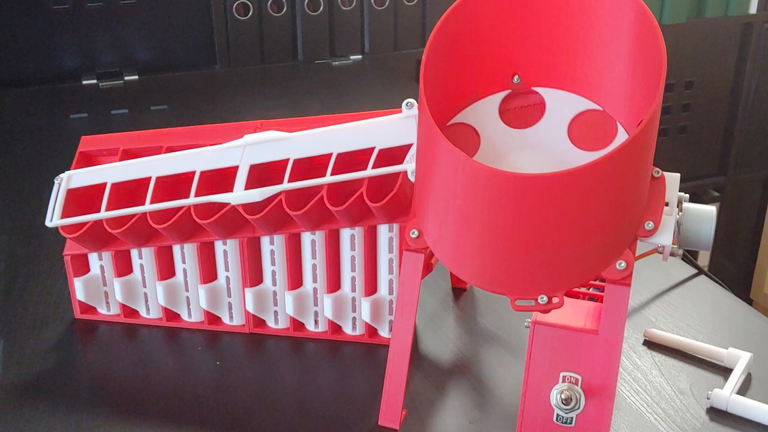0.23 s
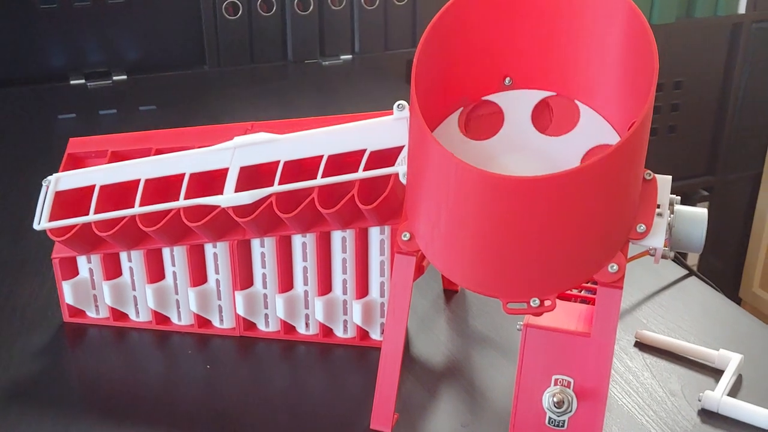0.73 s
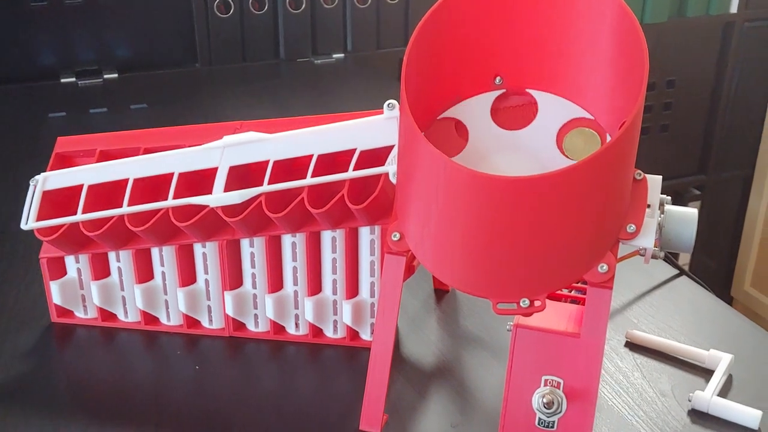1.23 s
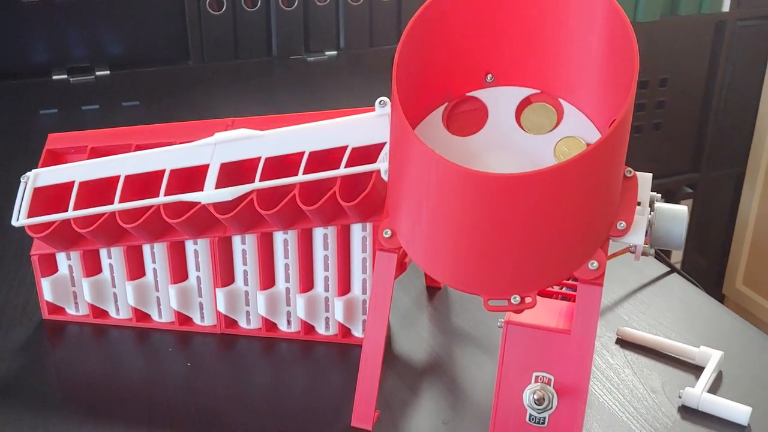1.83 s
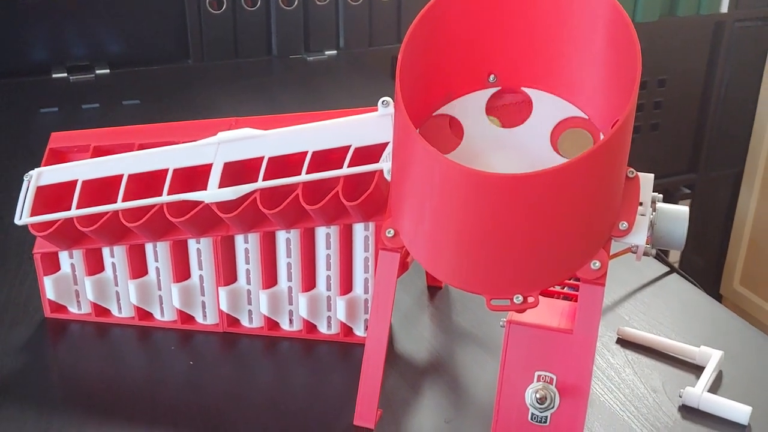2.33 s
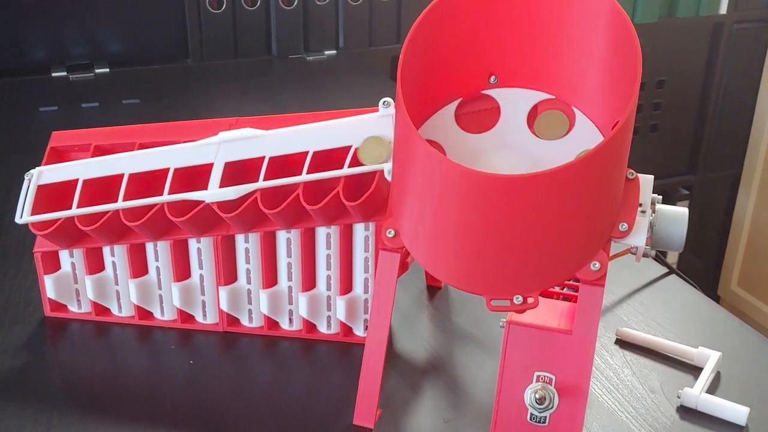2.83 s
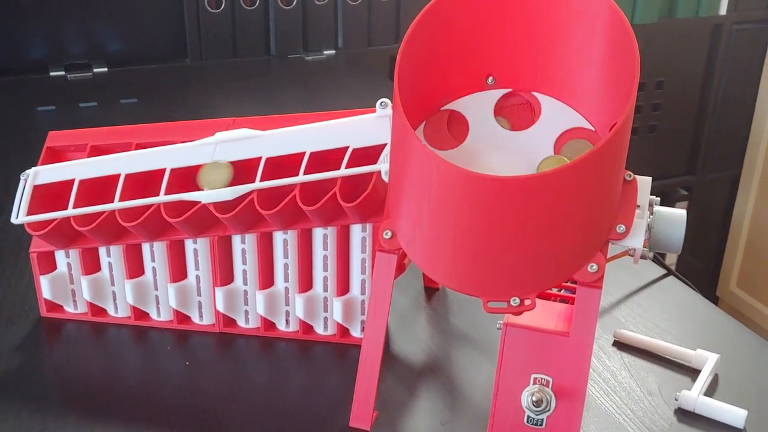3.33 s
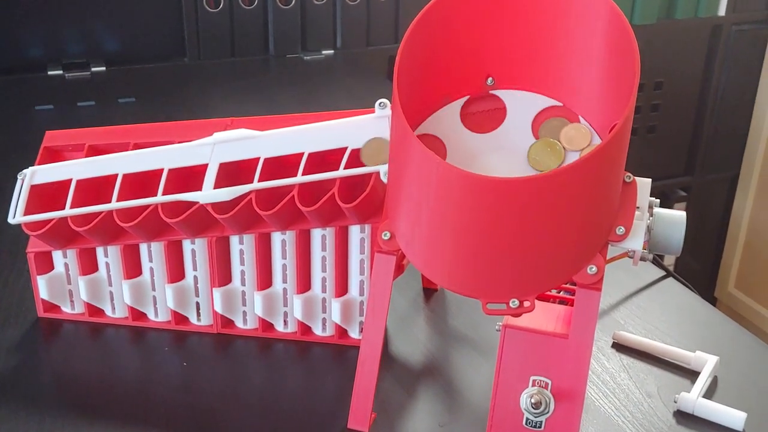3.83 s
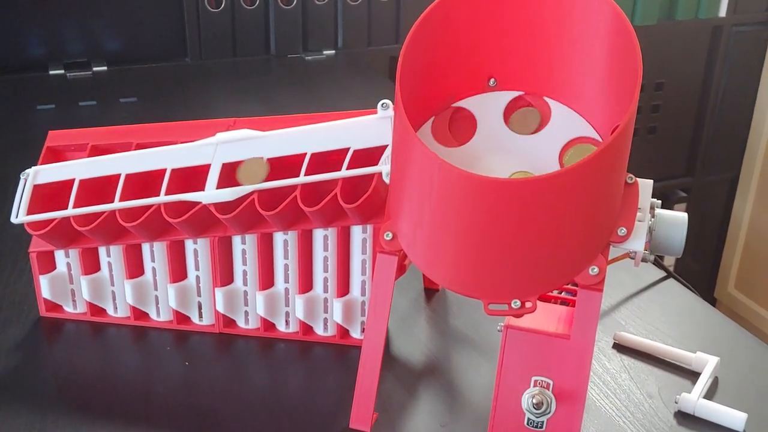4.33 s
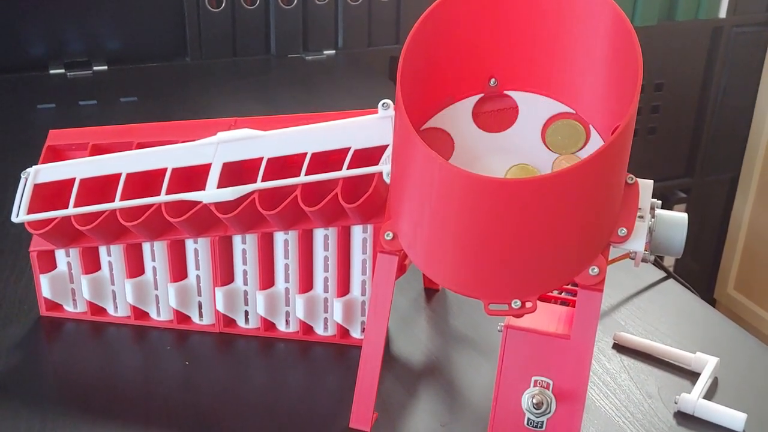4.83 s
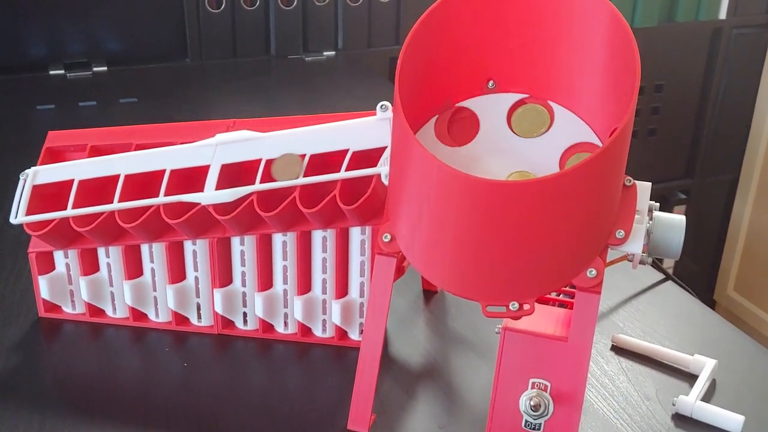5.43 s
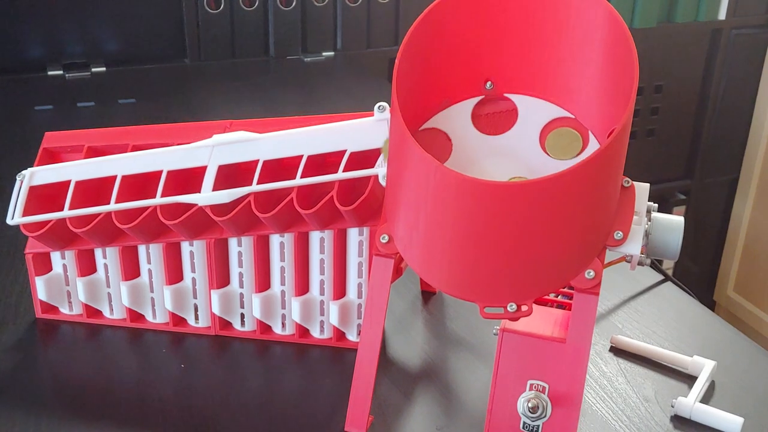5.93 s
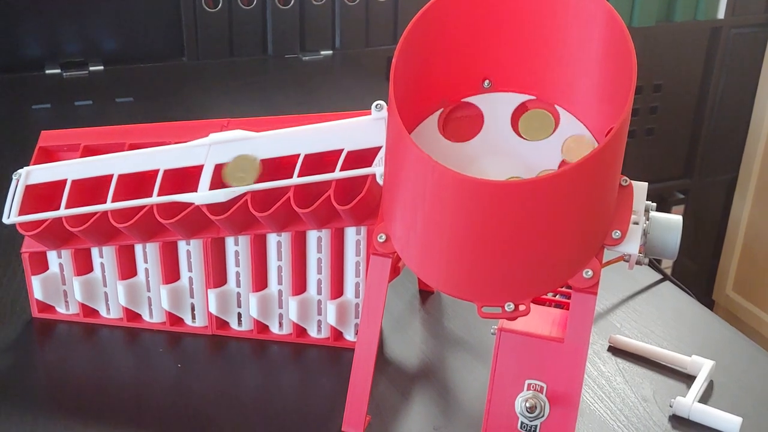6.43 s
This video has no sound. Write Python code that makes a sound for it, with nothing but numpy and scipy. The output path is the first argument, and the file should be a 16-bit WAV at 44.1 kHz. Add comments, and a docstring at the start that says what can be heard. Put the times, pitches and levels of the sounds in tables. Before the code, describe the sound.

A faint geared motor runs throughout, a low hum with a soft whine near 500 hertz and a rough whirr. In the first 1.5 seconds coins knock and scrape sparsely against a hollow plastic hopper, with a cluster near 0.2 to 0.7 and sharper knocks around 1.5. After a short lull, a dense dry clatter builds from 2.1 to 2.8. A coin then rolls down a ribbed plastic ramp, and a strong knock comes at 3.35. From 3.6 to 3.9 coins drop with hollow tube knocks, clinks and bright cracks. More rolling follows, with drops around 4.4 to 4.6 and a hard crack at 4.75 that rings briefly. Shuffling swells near 5.3; pocket snaps at 5.75 lead to the loudest landing at 5.87, with a thin high ring and slight thump. Another coin rolls to the end at 6.7 among light ticks. Close stereo pickup, small room.

```python
"""Coins scrape, tumble and knock in the plastic hopper of a motor-driven sorter, roll down its ramp and drop.
Noise bursts through the plastic's resonances make the scrapes and knocks; decaying sines make the clinks,
pocket snaps, tube knocks and free rings. Landing coins crack as coloured noise over a low table thump.
Underneath, a geared motor hums, whines and whirrs; decaying noise tails answer as a small room, in stereo."""
import sys
import numpy as np
from scipy import signal
from scipy.fft import rfft, irfft, next_fast_len
from scipy.io import wavfile
from scipy.ndimage import uniform_filter1d, map_coordinates

SR = 44100
rng = np.random.default_rng(int(sys.argv[2]) if len(sys.argv) > 2 else 0)


def wav_record(signal):
    """Record a signal, one row per channel, as 16-bit PCM in the file named by sys.argv[1]."""
    frames = np.transpose(np.atleast_2d(signal))
    bounded = np.clip(frames, -1, 1)
    # unit amplitude maps onto the largest positive 16-bit level
    quanta = np.round(bounded * 32767).astype(np.int16)
    wavfile.write(sys.argv[1], SR, quanta)


N = 294588

# a coin's edge knocks on the wall: (time [s], level [dB], edge tick against wall clack [dB])
EDGE_KNOCKS = [(0.1534, -18, -6.5), (0.156, -13, -5.5), (0.1675, -28, -6), (0.223, -18.5, -6),
               (0.2338, -23.5, -11), (.2655, -27.5, -2), (0.2871, -14.5, -4), (.294, -22.5, 1.5),
               (0.3585, -29, 1), (.376, -28, 0), (0.4215, -22.5, 3), (.464, -30, -4), (.515, -38, -9),
               (.549, -24.5, 0.5), (.613, -18, -1), (0.6251, -18, -21), (0.637, -21.5, -3.5),
               (.697, -23.5, -1), (.714, -23, -1.5), (0.873, -34.5, 0.5), (0.936, -30, -0.5),
               (1.0249, -28, -5.5), (1.0688, -36, -4), (1.086, -41, 6), (1.108, -32.5, 7.5),
               (1.1268, -29, 0), (1.1343, -17.5, -8), (1.1503, -31, 3), (1.2027, -28.5, 1),
               (1.2565, -22.5, -5.5), (1.328, -42, 3.5), (1.4193, -32, -5), (1.4537, -18.5, -8),
               (1.4975, -14, -7.5), (1.505, -20, -6.5), (2.011, -36, -7), (2.052, -28, -11),
               (2.078, -26, -1.5), (2.106, -34, -3), (2.127, -32.5, 1), (2.1593, -16.5, -9),
               (2.196, -19.5, -9), (2.2235, -18.5, -1), (2.2405, -16, -18), (2.252, -29, -16),
               (2.279, -15.5, -14), (2.3037, -18.5, -22), (2.3235, -20, -14), (2.3345, -19, -15),
               (2.359, -17.5, -17), (2.388, -17.5, -18), (2.418, -22, -28), (2.441, -23, -25),
               (2.468, -19.5, -31), (2.5503, -18, -22), (2.563, -21.5, -17), (2.592, -24, -16),
               (2.609, -15, -5.5), (2.618, -18.5, -8), (2.638, -17.5, -8.5), (2.7585, -20.5, -14),
               (2.7785, -13.5, -3), (2.7818, -15, -6.5), (2.9995, -26.5, -4), (3.2565, -21, -9.5),
               (3.286, -27, -2), (3.315, -25, -6), (3.3455, -10, -9), (3.401, -17, -10), (3.5692, -13, -23),
               (3.6387, -16.5, 0), (3.9856, -30.5, 9.5), (4.037, -27.5, -10), (4.0496, -20.5, -1.5),
               (4.2191, -23, -4), (4.3667, -23.5, -10), (4.376, -24, 6), (4.4905, -22.5, 0.5),
               (4.537, -19.5, -13), (4.5714, -21, -5), (4.5833, -25, -1), (4.673, -22.5, -5),
               (4.822, -30, 4), (4.831, -32, 6), (4.893, -30, 5.5), (4.9306, -31, 5.5), (5.177, -26, -7),
               (5.2105, -14.5, -3.5), (5.238, -27, 2), (5.343, -22, -19), (5.364, -27, -12),
               (5.56, -27, -12), (5.601, -17, -9.5), (5.647, -28, -6), (5.665, -15.5, -10),
               (5.7025, -26, -6), (5.7528, -23, 3), (5.783, -37, 5), (5.7931, -19.5, 0), (5.937, -36.5, 15),
               (5.964, -40, 18), (6.0416, -22.5, 0), (6.174, -39, -2), (6.292, -33, -4),
               (6.338, -25.5, -14), (6.47, -26.5, -2), (6.566, -29.5, -4), (6.598, -24.5, -10),
               (6.625, -24, -6)]


def amp(db):
    """Decibels to gain."""
    return 10 ** (np.asarray(db) / 20)


def unit(x):
    """x at rms 1."""
    return x / np.sqrt(np.mean(x ** 2) + 1e-20)


def along(points, hz):
    """Values of (frequency [Hz], value) points, read on a log frequency axis."""
    f, v = np.transpose(points)
    return np.interp(np.log(hz + 1), np.log(f + 1), v)


def bumps(modes, hz):
    """Gain in dB of a set of resonances."""
    return sum(db / (1 + (2 * (hz - centre) / width) ** 2) for centre, width, db in modes)


def wobble(rate):
    """A smooth random curve with rate knots a second."""
    knots = rng.standard_normal(int(N * rate / SR) + 4)
    return map_coordinates(knots, [np.arange(N) * rate / SR])


def response(gain_db, size=8192):
    """The causal, minimum-phase impulse response that has the gain gain_db(Hz)."""
    gain = amp(gain_db(np.fft.rfftfreq(size, 1 / SR)))
    cepstrum = irfft(np.log(gain + 1e-6))
    # folding the cepstrum forward in time makes the response causal
    cepstrum[1:size // 2] *= 2
    cepstrum[size // 2 + 1:] = 0
    return irfft(np.exp(rfft(cepstrum)))[:size // 2]


def through(x, impulse):
    """Channels x convolved with an impulse response."""
    return signal.oaconvolve(x, np.atleast_2d(impulse), axes=1)[:, :N]


def add(track, s, sound):
    """Mix a sound into the track at time s."""
    part = track[:, max(round(s * SR), 0):][:, :sound.shape[-1]]
    part += sound[..., :part.shape[1]]


def plastic(lo_hz, hi_hz):
    """The sorter's ring within one register: contact colour and body resonances, at energy 1."""
    # resonances of hopper and ramp: (frequency [Hz], width [Hz], level [dB])
    body_modes = [(154, 44, 16), (302, 59, 6.5), (461, 24, 4), (546, 15, -8), (631, 24, 7), (794, 65, 1.5),
                  (951, 49, 5), (1193, 27, 1.5), (1363, 56, -9), (1680, 18, -8.5), (1670, 19, 1),
                  (1810, 11, 4), (2353, 24, 5.5), (2782, 120, 3.5), (3570, 170, 2)]
    # colour of a coin's contact with the plastic: (frequency [Hz], level [dB])
    contact_colour = [(30, -38), (110, -37), (200, -18.5), (350, -15), (700, -5), (1100, -1), (2000, 3.5),
                      (3000, -5), (5000, -8.5), (7200, -8.5), (8400, -35.5), (11000, -34.5), (12800, -37),
                      (15500, -33.5)]

    def gain_db(hz):
        low_skirt = 1 + (lo_hz / (hz + 1)) ** 6
        high_skirt = 1 + (hz / hi_hz) ** 6
        return along(contact_colour, hz) + bumps(body_modes, hz) - 10 * np.log10(low_skirt * high_skirt)

    ring = response(gain_db)
    return ring / np.linalg.norm(ring)


def jostle(rate=200, scatter_db=1.5, contact_s=0.006, clatter_db=-1.0, scrape_db=-2.5, glint_db=-16.5,
           hardness=0.41):
    """Jostled coins: many small contacts over a sliding rub excite the plastic, register by register."""
    # the turning disc drags its coins along the hopper floor: (time [s], level [dB])
    drag_curve = [(0, -37), (.1, -50), (.18, -43), (1.6, -39.5), (1.85, -42), (2.3, -34.5), (6.68, -37)]
    # a rolling rim on the ribbed ramp: (frequency [Hz], level [dB])
    rim_colour = [(400, -36), (900, 13), (1500, 1), (2000, -10), (2380, 22), (2600, -22), (4000, -40)]
    smooth_scrape_db = -8.5  # edge scrape of dragged or rolling coins against their clatter
    ramp_db, rim_db = -7.5, -2  # ramp rumble and rim against the clatter of a rolling coin
    rub = 0.09  # steady sliding power under the contacts

    shoved, scraped = shoving()
    rolled = rolling()
    dragged = amp(np.interp(np.arange(N) / SR, *np.transpose(drag_curve))) ** 2
    smooth = rolled + dragged
    clatter = 10 * np.log10(shoved + smooth)
    scrape = 10 * np.log10(scraped + smooth * amp(smooth_scrape_db) ** 2)

    strength = amp(scatter_db * np.clip(rng.standard_normal(N), -2, 2)) ** 2
    touches = (rng.random(N) < rate / SR) * strength
    power = signal.lfilter([1], [1, -np.exp(-1 / (contact_s * SR))], touches)
    power /= np.abs(uniform_filter1d(power, SR // 14)) + 1e-9  # level out the local density

    def force():
        return np.sqrt(power + rub) * rng.standard_normal((2, N))

    body = amp(clatter + clatter_db) * through(force(), plastic(45, 3100))
    ramp = amp(ramp_db) * np.sqrt(rolled) * through(force(), plastic(280, 510))
    rim_noise = unit(through(force(), response(lambda hz: along(rim_colour, hz))))
    rim = amp(rim_db) * np.sqrt(rolled) * rim_noise
    edges = amp(scrape + scrape_db) * through(force(), plastic(2370, 10700))
    # harder contacts are shorter, so the top octave grows faster than the rest
    glint_level = scrape + glint_db + hardness * (scrape - scrape.max())
    glint = amp(glint_level) * through(force(), plastic(14000, 24000))
    return body + ramp + rim + edges + glint + grinding(clatter, scrape) + ticks(clatter, scrape)


def shoving():
    """Power of clatter and edge scrape as the disc shoves the heap, which swells and settles."""
    # (time of the height [s], length [s], level [dB], edge scrape against clatter [dB])
    shove_list = [(0.326, 0.16, -29, -0.5), (0.446, 0.26, -35, -8), (0.638, 0.18, -26.5, -2.5),
                  (1.052, 0.027, -30, -0.5), (1.16, 0.34, -32, -5), (1.272, 0.051, -36, -2),
                  (1.52, 0.11, -31, -4), (1.665, 0.058, -27, -3.5), (2.077, 0.13, -30, -6.5),
                  (2.268, 0.14, -18, -2), (2.588, 0.83, -27, -28), (2.762, 0.073, -27.5, 1.5),
                  (3.296, 0.15, -30, -1.5), (3.394, 0.071, -22, -1), (3.483, 0.19, -22, -10),
                  (3.699, 0.12, -22, -3), (3.708, 0.018, -16, -10), (4.047, 0.43, -38.5, 2),
                  (4.24, 0.14, -40, 7), (4.376, 0.16, -28, 1.5), (4.562, 0.21, -30, -5),
                  (4.804, 0.29, -30.5, -8), (5.276, 0.2, -20.5, -3.5), (5.419, 0.054, -28, 3.5),
                  (5.57, 0.13, -36, 6.5), (5.705, 0.2, -20.5, -14.5), (5.88, 0.21, -29.5, -4),
                  (6.638, 0.092, -28, -3)]
    fall_db, point = 18, 1.365  # drop one length before the height; shape (1 pointed, 2 round)
    settle_ratio = 0.95  # settling time over swelling time
    t, clatter, scrape = np.arange(N) / SR, np.zeros(N), np.zeros(N)
    for s, length, db, edge_db in shove_list:
        away = np.maximum(s - t, (t - s) / settle_ratio) / length
        power = amp(db - fall_db * np.minimum(away, 10) ** point) ** 2
        clatter += power
        scrape += power * amp(edge_db) ** 2
    return clatter, scrape


def rolling():
    """Power of the coins rolling down the ramp, each louder as it gains speed."""
    # (start [s], length [s], level at the start [dB])
    roll_list = [(2.8, 0.52, -37.5), (3.912, 0.23, -38.5), (5.103, 0.56, -42), (6.018, 0.8, -37)]
    growth_db_per_s = 6
    edge_s = 0.38  # fade-in ahead of the start and fade-out after the end
    t, power = np.arange(N) / SR, np.zeros(N)
    for s, length, db in roll_list:
        on_ramp = np.clip(np.minimum(t - s, s + length - t) / edge_s + 1, 0, 1)
        gain = amp(db + growth_db_per_s * np.clip(t - s, 0, length))
        power += (on_ramp * gain) ** 2
    return power


def grinding(clatter, scrape, count=1100, grain_db=0.0, crisp_db=1.5, crisp_t60=0.0013):
    """Coins catch and slip on ribbed plastic: each slip is a dry grain of its own pitch with a crisp edge."""
    low_hz, high_hz = 1000, 2500
    grain_t60, range_db = 0.008, 15  # decay [s]; spread of grain levels
    grains, edges, t = np.zeros((2, N)), np.zeros((2, N)), np.arange(SR // 50) / SR
    shape = (1 - np.exp(-20 * t / grain_t60)) * amp(-60 * t / grain_t60)
    for when, size, pitch, *phase in rng.random((count, 5)):
        at = int(when * (N - 1))
        size_db = range_db * size ** 2  # squared, so large grains are rare
        hz = low_hz * (high_hz / low_hz) ** pitch
        swing = np.sin(2 * np.pi * (hz * t + np.array(phase)[:, None]))
        add(grains, at / SR, amp(clatter[at] + grain_db + size_db) * shape * swing)
        crisp = amp(scrape[at] + crisp_db + size_db - range_db - 60 * t / crisp_t60)
        add(edges, at / SR, crisp * rng.standard_normal((2, len(t))))
    return grains + through(edges, plastic(2000, 12000))


def ticks(clatter, scrape, count=80, wall_db=-4, edge_db=1, glint_db=-13.5, spread_db=3.0, t60=0.005):
    """Now and then a jostled coin tips over: a harder, separate burst at a random moment."""
    chance = rng.random((count, 2))
    at = (chance[:, 0] * (N - 1)).astype(int)
    size = spread_db * (2 * chance[:, 1] - 1)

    def taps(db):
        return blows(at / SR, db[at] + size, t60=t60, rise_s=0.00016, chatter_db=4, chatter_t60=0.084)

    wall = through(taps(clatter + wall_db), plastic(590, 4600))
    edge = through(taps(scrape + edge_db), plastic(1960, 12000))
    glint = through(taps(scrape + glint_db), plastic(6800, 21000))
    return wall + edge + glint


def blows(times, levels_db, t60, rise_s, chatter_db, chatter_t60):
    """One short burst of force a knock, followed by the uneven little bounces of the coin settling."""
    shortest_s, longest_s = 0.004, 0.015  # flight between bounces
    contact_s, rub = 0.0035, 0.15  # decay of a contact; rub between contacts (0-1)
    track, t = np.zeros((2, N)), np.arange(SR // 5) / SR
    rise = 1 - np.exp(-t / rise_s)
    blow = amp(-60 * t / t60)
    chatter = amp(chatter_db - 60 * t / chatter_t60)
    strength = np.sqrt(np.mean((rise * (blow + chatter))[:SR // 100] ** 2))  # rms of the first 10 ms
    for s, db in zip(times, levels_db):
        contacts = np.append(0, np.cumsum(rng.uniform(shortest_s, longest_s, size=60)))
        age = t - contacts[np.searchsorted(contacts, t, side="right") - 1]  # time since the last contact
        bounces = unit(np.exp(-age / contact_s) * (1 - np.exp(-age / rise_s)) + rub)
        envelope = rise * (blow + chatter * bounces)
        add(track, s, amp(db) / strength * envelope * rng.standard_normal((2, len(t))))
    return track


def knocks(thud_db=0.0, clack_db=-2.5, tick_db=-3, glint_db=-17.0, hardness=0.12):
    """A blow stirs the hollow body, the thin wall and the coin's edge, each in its own register."""
    # a coin falls flat and drums on the hollow body:
    # (time [s], thud level [dB], wall clack against thud [dB], edge tick against thud [dB])
    flat_falls = [(3.567, -33.5, 14, 8), (3.6043, -28, 13, 6), (3.638, -24.5, 15, 0), (3.786, -22.5, -6, 3),
                  (3.79, -18.5, 0.5, -8.5), (3.8032, -28.5, 2, -9), (3.827, -29, -12, -12),
                  (3.9031, -24.5, -2, 7.5), (3.9178, -21.5, -2, 3), (3.9345, -26.5, -13, 7.5),
                  (4.5828, -27, 3, -2), (4.749, -34, 7, 14.5), (5.7038, -22, -6, -2),
                  (5.8733, -36.5, 9, 22)]
    edge_thud_db = -15.5  # body thud of an edge knock against its clack
    on_edge = [(s, db + edge_thud_db, db, db + edge_db) for s, db, edge_db in EDGE_KNOCKS]
    flat = [(s, db, db + wall_db, db + edge_db) for s, db, wall_db, edge_db in flat_falls]
    s, thud, clack, tick = np.transpose(on_edge + flat)
    glint_level = tick + glint_db + hardness * (tick - tick.max())  # harder blows are brighter
    hollow = blows(s, thud + thud_db, t60=0.014, rise_s=0.00015, chatter_db=-15.5, chatter_t60=0.17)
    wall = blows(s, clack + clack_db, t60=0.0077, rise_s=0.0012, chatter_db=-0.5, chatter_t60=0.066)
    edge = blows(s, tick + tick_db, t60=0.019, rise_s=0.00034, chatter_db=-11.5, chatter_t60=0.12)
    glint = blows(s, glint_level, t60=0.014, rise_s=0.00088, chatter_db=-3, chatter_t60=0.11)
    low = through(hollow, plastic(229, 1080)) + through(wall, plastic(980, 2900))
    high = through(edge, plastic(2940, 10000)) + through(glint, plastic(9600, 20000))
    return low + high + clinks()


def clinks(t60=0.022, rise_s=0.001, spread=0.0745, clink_db=7.5, count=6):
    """Each spot that a coin hits answers with its own cluster of quickly damped modes."""
    # one coin clinks against another: (time [s], centre frequency [Hz], level [dB])
    coin_clinks = [(2.608, 2670, -25), (3.401, 2700, -24), (3.5333, 3580, -28), (3.605, 2680, -16.5),
                   (3.786, 3540, -21.5), (3.9181, 3830, -30), (3.9873, 3900, -31), (4.376, 1950, -15),
                   (4.377, 3070, -16), (4.54, 2085, -17), (4.5911, 3300, -23), (4.7478, 3920, -28),
                   (4.832, 3870, -26.5), (4.8916, 3650, -27), (5.2105, 4330, -18), (5.7036, 3540, -22),
                   (5.753, 3630, -19.5)]
    rim_hz, rim_db = 4794, -22  # the coin's rim, stirred by every edge knock
    rim_clinks = [(s, rim_hz, db + rim_db) for s, db, _ in EDGE_KNOCKS]
    track, t = np.zeros((2, N)), np.arange(SR // 20) / SR
    shape = (1 - np.exp(-t / rise_s)) * amp(-60 * t / t60)
    for s, hz, db in coin_clinks + rim_clinks:
        detune, phase = rng.standard_normal((2, 2, count, 1))
        modes = np.sin(2 * np.pi * (hz * (1 + spread * detune) * t + phase))
        add(track, s, amp(db + clink_db) * shape * modes.sum(axis=1))
    return track


def drops(crack_t60=0.014, rise_s=0.000083, thump_hz=60, thump_t60=0.052):
    """A coin landing on metal cracks as a noise burst; the table takes a thump of three low sines."""
    # (time [s], crack level [dB], thump level [dB])
    landings = [(3.637, -21, -60), (3.7865, -21, -70), (3.904, -31, -94), (3.917, -12.5, -78),
                (4.377, -22, -85), (4.539, -25, -85), (4.584, -17, -89), (4.749, -6.5, -68),
                (5.753, -20.5, -80), (5.8743, -5.5, -39), (5.963, -12.5, -80)]
    # colour of metal striking metal: (frequency [Hz], level [dB])
    crack_colour = [(100, -52), (2000, -18), (5000, -8.5), (7200, 21), (8600, -1.5), (11500, 2),
                    (13200, -8), (15200, -16)]
    track, cracks, t = np.zeros((2, N)), np.zeros((2, N)), np.arange(SR // 2) / SR
    table = sum(np.sin(2 * np.pi * ratio * thump_hz * t) for ratio in (1, 1.8, 2.7))
    for s, crack_db, thump_db in landings:
        crack = amp(crack_db - 60 * t / crack_t60) * (1 - np.exp(-t / rise_s))
        add(cracks, s, crack * rng.standard_normal((2, len(t))))
        add(track, s, amp(thump_db - 60 * t / thump_t60) * table)
    metal = response(lambda hz: along(crack_colour, hz))
    return track + through(cracks, metal / np.linalg.norm(metal))


def snaps(rise_s=0.0016, snap_db=3):
    """A wedged coin snaps free and the pocket's rim springs back with a short pitched clack."""
    # (time [s], level [dB])
    snap_list = [(3.6063, -8.5), (4.5383, -12.5), (4.551, -14), (5.753, -5), (5.7945, -6)]
    # modes of the pocket's rim: (frequency [Hz], level [dB], t60 [s])
    pocket_modes = [(1720, -7, 0.025), (2050, 1, 0.026), (2280, 1, 0.02), (3150, -4, .014),
                    (3637, 3.5, 0.018), (3900, -5, 0.012)]
    track, t = np.zeros((2, N)), np.arange(SR // 20) / SR
    rise = 1 - np.exp(-t / rise_s)
    for s, db in snap_list:
        for hz, mode_db, t60 in pocket_modes:
            swing = np.sin(2 * np.pi * (hz * t + rng.random((2, 1))))
            add(track, s, amp(db + snap_db + mode_db - 60 * t / t60) * rise * swing)
    return track


def tubes(rise_s=0.00064, uneven_db=2):
    """Each blow rings the modes of its collecting tube; where the coin lands decides which speak most."""
    # hollow knock of each tube, by name: (frequency [Hz], level [dB], t60 [s])
    tube_modes = {"far": [(300, -14, .2), (340, -9, .08), (410, -6, .06), (455, -1, .09), (595, -13, .04),
                  (690, -5, .05), (760, -3, .06), (925, 2, .08), (1170, -6, .06)], "near": [(179, -17, .09),
                  (370, -9, .035), (452, -5, .04), (560, -4, .03), (620, -1, .04), (750, -2, .04),
                  (885, 3, .04)]}
    # a coin strikes a tube: (time [s], tube name, level [dB], pitch stirred most [Hz])
    hits = [(3.574, "far", -23, 420), (3.606, "far", -24, 400), (3.64, "far", -18.5, 800),
            (3.787, "far", -16.5, 740), (3.797, "far", -23, 332), (3.904, "far", -21, 620),
            (3.92, "far", -19, 430), (4.584, "near", -29, 900), (4.593, "near", -20, 1100),
            (4.7531, "near", -19.5, 560), (4.759, "near", -25, 560), (5.876, "near", -26, 330)]
    focus_db = 6.5  # loss of a mode one octave from the pitch stirred most
    track, t = np.zeros((2, N)), np.arange(SR // 3) / SR
    rise = 1 - np.exp(-t / rise_s)
    for s, tube, db, centre_hz in hits:
        for hz, mode_db, t60 in tube_modes[tube]:
            focus_loss = focus_db * np.log2(hz / centre_hz) ** 2
            level = db + mode_db - focus_loss + uneven_db * rng.standard_normal((2, 1))
            swing = np.sin(2 * np.pi * (hz * t + rng.random((2, 1))))
            add(track, s, amp(level - 60 * t / t60) * rise * swing)
    # the tube knocks carry almost no bass
    return through(track, response(lambda hz: along([(50, -24), (120, -10), (220, 0)], hz)))


def rings(waver=0.42):
    """A free coin rings on until it lies flat; grazing contacts keep jolting the phase of each mode."""
    # free ring of two sizes of coin, by name: (frequency [Hz], level [dB], t60 [s])
    coin_modes = {"first": [(7041, -7, 0.24), (11300, -18, 0.23), (13810, -24, .24), (15010, -11, 0.4),
                  (15280, -2, 0.22)], "second": [(7100, -3, 0.77), (7488, -15, .6), (9600, -12, .12),
                  (11900, -8, 0.33), (15300, -4, 1.1), (15335, -6, 1.6)]}
    # (time [s], coin name, level [dB], length [s])
    ring_list = [(4.748, "first", -31, .27), (5.753, "second", -55, 0.14), (5.8738, "second", -32, .16)]
    lie_fade_s = 0.025  # time to fall silent
    track, t = np.zeros((2, N)), np.arange(SR // 2) / SR
    for s, coin, db, length in ring_list:
        upright = np.clip((length - t) / lie_fade_s, 0, 1)
        for hz, mode_db, t60 in coin_modes[coin]:
            start = rng.uniform(0, 2 * np.pi, (2, 1))
            jolts = np.cumsum(rng.standard_normal((2, len(t))), axis=1) / np.sqrt(SR / 1000)
            swing = np.sin(2 * np.pi * hz * t + start + waver * jolts)
            add(track, s, amp(db + mode_db - 60 * t / t60) * upright * swing)
    return track


def motor(gear_db=-48, unsteady=0.00073, rumble_db=-74):
    """Low tones and the gears' whine share a slightly unsteady speed, over a soft whirr and rumble."""
    # motor tones: (frequency [Hz], level [dB])
    hum_tones = [(49, -89), (111, -89), (171, -61)]
    # the gears' whine sinks as coins load the disc: (time [s], pitch [Hz], level [dB])
    whine_curve = [(0, 512, -53), (2.1, 511, -53), (2.6, 509, -54), (3, 505, -60), (6.68, 505, -60)]
    # colour of the gear whirr: (frequency [Hz], level [dB])
    gear_colour = [(15, -32), (25, -7.5), (438, 12), (501, 14), (558, -15), (637, 17.5), (1350, -2.5),
                   (1810, -25), (3260, -12), (6900, -20), (8550, -53), (10000, -56), (15000, -35)]
    rumble_colour = [(15, -21), (35, 6), (80, -6), (300, -64)]  # (frequency [Hz], level [dB])
    shaft_hz, shaft_swing_db = 23.2, 2.5  # turns a second; swing of the whirr in each turn
    whine_waver_db, gear_rough_db = 2, 2.2  # random flutter of whine and whirr

    t = np.arange(N) / SR
    s, pitch, level = np.transpose(whine_curve)
    speed = 1 + unsteady * wobble(4.38)

    def sine(hz):
        return np.sqrt(2) * np.sin(2 * np.pi * (np.cumsum(hz * speed) / SR + rng.random()))

    hum = sum(amp(db) * sine(hz) for hz, db in hum_tones)
    whine = amp(np.interp(t, s, level) + whine_waver_db * wobble(11)) * sine(np.interp(t, s, pitch))
    # the teeth bind once a turn of the shaft and mesh unevenly
    turn = np.sin(2 * np.pi * shaft_hz * np.cumsum(speed) / SR)
    meshing = amp(shaft_swing_db * turn + gear_rough_db * wobble(70))
    gear_noise = through(rng.standard_normal((2, N)), response(lambda hz: along(gear_colour, hz)))
    whirr = amp(gear_db) * unit(meshing * gear_noise)
    low = through(rng.standard_normal((2, N)), response(lambda hz: along(rumble_colour, hz)))
    rumble = amp(rumble_db + 1.9 * wobble(3.6)) * unit(low)
    return whirr + rumble + np.array([hum + whine, np.zeros(N)])  # the tones sit in the middle


def room(x, delay_s=.005, count=4):
    """Diffuse tails; the coins move about, so successive moments meet different ones."""
    # reverberation time: (frequency [Hz], t60 [s])
    decay_times = [(150, 0.63), (1000, 0.26), (5000, 0.26), (14000, 0.41)]
    wet, t = np.zeros((2, N)), np.arange(N) / SR
    for k in range(count):
        hz, age, z = signal.stft(rng.standard_normal((2, SR // 2)), SR, nperseg=256)
        decay = amp(-60 * age / along(decay_times, hz)[:, None])
        tail = signal.istft(z * decay, SR, nperseg=256)[1]
        tail = np.pad(tail, ((0, 0), (round(delay_s * SR), 0)))
        turn = np.cos(2 * np.pi * (t - k / count))  # the tails take turns within each second
        wet += through(x * np.maximum(turn, 0), tail / np.linalg.norm(tail[0]))
    return wet


def scene(room_db=-7.0, near_room_db=-12):
    """All sources as middle and side; the bass is nearly the same on both sides, the treble is not."""
    # stereo width: (frequency [Hz], side gain [dB])
    side_gain = [(60, -7), (170, -16), (400, -12.5), (750, -10), (1300, -9.5), (2400, -2), (4400, 1.5),
                 (15000, -1.5)]
    hopper = jostle() + knocks()
    near = drops() + snaps() + tubes()
    echo = room(amp(room_db) * hopper + amp(near_room_db) * near)
    mid, side = hopper + near + echo + rings() + motor()
    side = through(side[None], response(lambda hz: along(side_gain, hz)))[0]
    return np.array([mid + side, mid - side])


def record(dry, gain_db=-1):
    """Each microphone port adds its own resonances; nothing passes above the band limit."""
    # resonances of the two microphone ports: (frequency [Hz], width [Hz], level [dB])
    left_modes = [(2040, 860, -8), (2740, 1140, 1), (4370, 3700, -3), (6760, 830, -11.5), (9800, 350, 12.5),
                  (11500, 800, 9.5), (12500, 650, 3)]
    right_modes = [(1675, 215, 3), (2840, 930, -10.5), (4535, 940, 5), (6170, 1310, -4), (6860, 570, 6),
                   (11600, 830, 1.5), (14000, 1700, 5)]
    top_hz = 15900
    ports = [response(lambda hz: bumps(port, hz) + gain_db) for port in (left_modes, right_modes)]
    sound = np.clip(through(dry, np.array(ports)), -1, 1)
    size = next_fast_len(N + SR // 4)
    passed = np.fft.rfftfreq(size, 1 / SR) < top_hz
    return irfft(rfft(sound, size) * passed, size)[:, :N]


dry = scene()
out = record(dry)
wav_record(out)
```